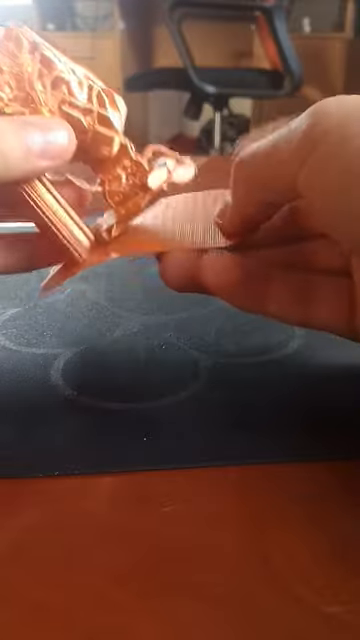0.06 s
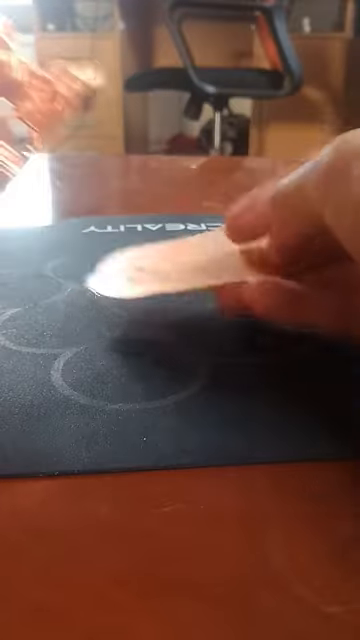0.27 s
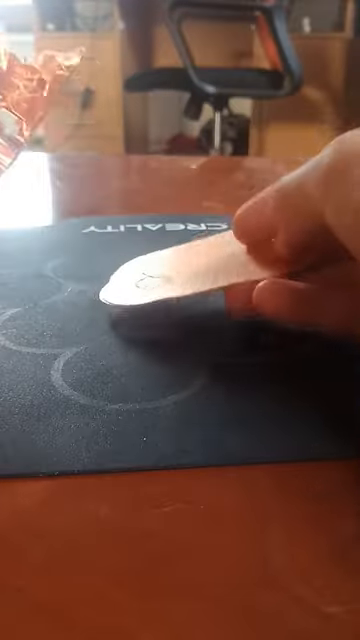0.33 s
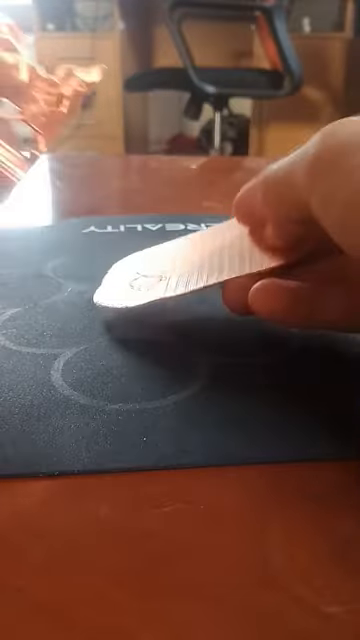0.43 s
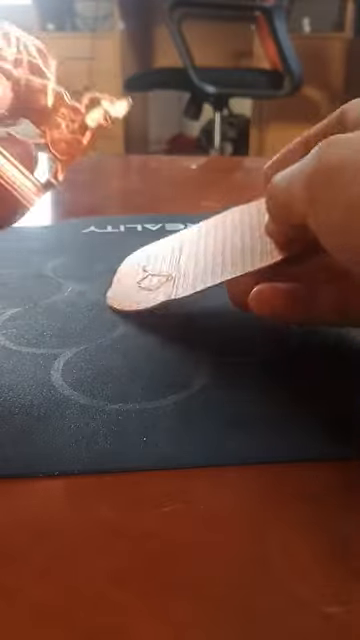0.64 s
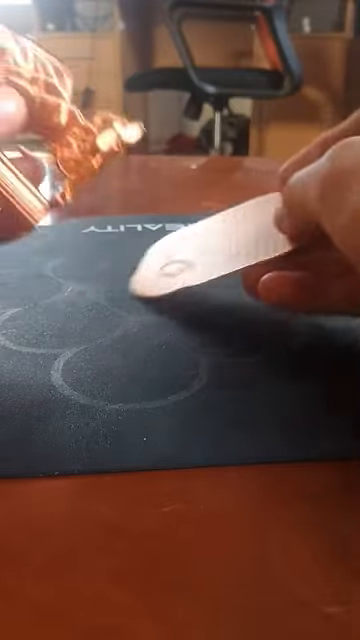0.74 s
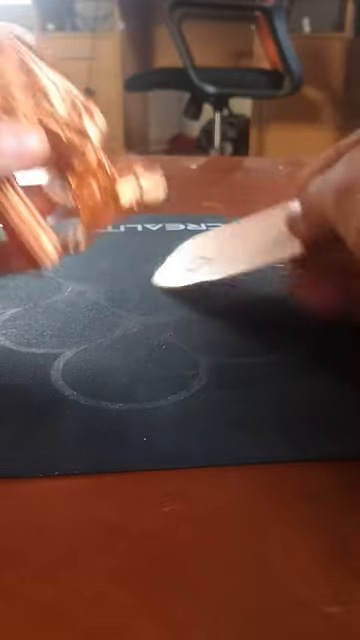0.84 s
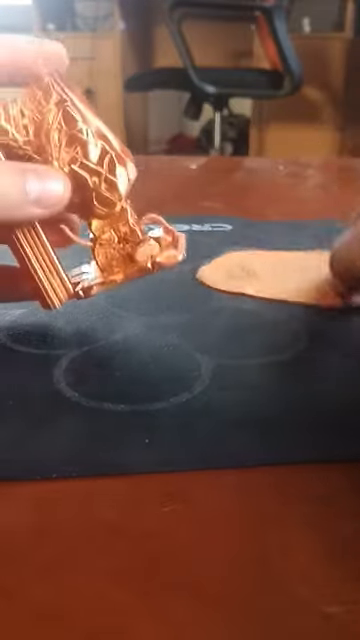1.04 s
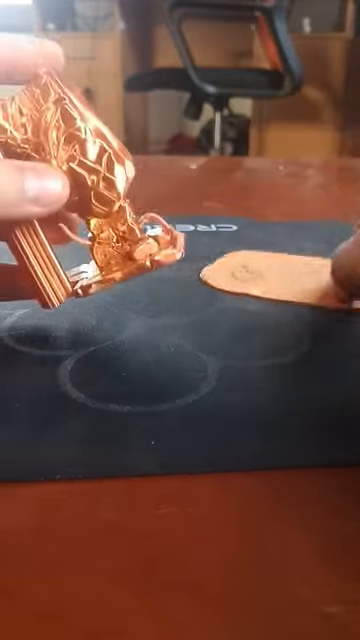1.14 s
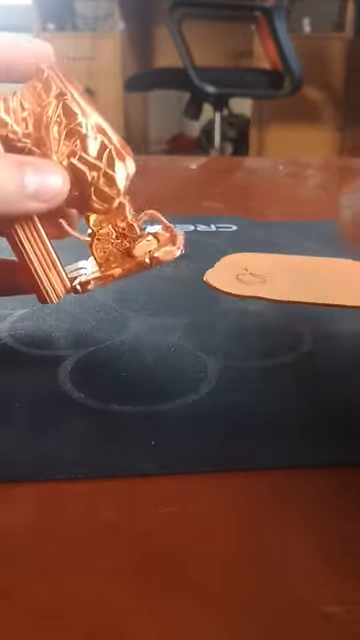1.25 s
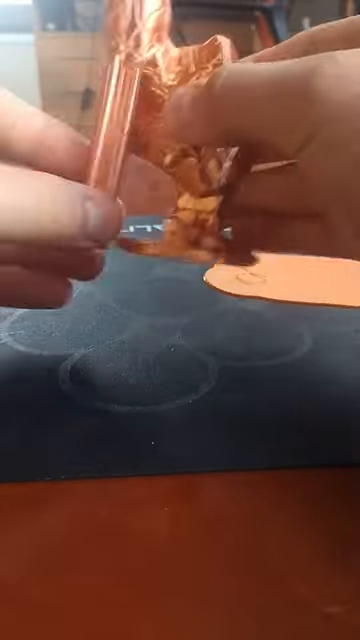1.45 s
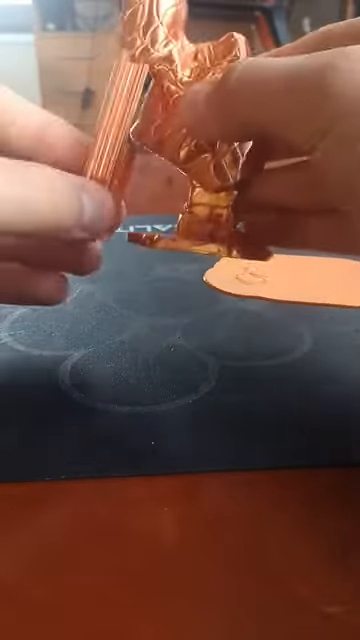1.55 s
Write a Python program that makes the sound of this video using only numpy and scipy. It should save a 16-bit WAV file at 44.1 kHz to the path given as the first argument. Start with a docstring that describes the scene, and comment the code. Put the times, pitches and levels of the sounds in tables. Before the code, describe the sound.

Plastic snapping off a small figure in sharp cracks, then a soft tap.

```python
"""A printed plastic support snaps off a figure, close up, in a pair of hands above a desk.
A few small struts crack and ring, then the support tears free in a loud cluster of snaps;
later it is laid on the mat with a few soft taps. Dull knocks carry through hands and desk.
A small room answers each click. Underneath lie room tone, a low hum, faint finger rubs
and thin background tones, and the overall level dips briefly a few times."""
import sys
import numpy as np
from scipy import signal
from scipy.fft import rfft, irfft
from scipy.io import wavfile
from scipy.ndimage import uniform_filter1d

SR = 44100
rng = np.random.default_rng(int(sys.argv[2]) if len(sys.argv) > 2 else 0)


def master(y):
    """Save y as 16-bit WAV."""
    cut = np.clip(np.atleast_2d(y).T, -1, 1)
    pcm = np.round(cut * 32767)  # scale
    wavfile.write(sys.argv[1], SR, pcm.astype(np.int16))


N = 70560
TIME, FREQS = np.arange(N) / SR, np.fft.rfftfreq(N, 1 / SR)


def amp(db):
    """Decibels to gain."""
    return 10 ** (np.asarray(db) / 20)


def unit(x):
    """Scales to rms 1."""
    return x / np.sqrt(np.mean(x ** 2) + 1e-20)


def curve(points, hz):
    """Reads a table on a log-frequency axis."""
    f, value = np.transpose(points)
    return np.interp(np.log(hz + 1), np.log(f + 1), value)


def add(mix, s, sound):
    """Mixes a sound in at s seconds."""
    part = mix[..., max(round(s * SR), 0):][..., :sound.shape[-1]]
    part += sound[..., :part.shape[-1]]


def minimum_phase(db):
    """Tightest impulse response with the given spectrum."""
    log_gain = np.log(amp(np.r_[db, db[-2:0:-1]]))
    return np.fft.ifft(np.exp(np.conj(signal.hilbert(log_gain)))).real


def drift(rate_hz):
    """Slow random modulation of rms 1."""
    return unit(irfft(rfft(rng.standard_normal(N)) * (FREQS > 0) / (1 + (FREQS / rate_hz) ** 4), N))


def wavering_tone(hz, db, waver_db, wander_hz):
    """A sine that wavers in level and pitch."""
    gain = np.sqrt(2) * amp(db + waver_db * drift(5))
    pitch = hz + wander_hz * drift(3.8)
    return gain * np.sin(2 * np.pi * np.cumsum(pitch) / SR)


# EQ of the room tone: f/Hz, relative level/dB
ROOM_TONE_EQ = [(20, -11), (45, 8), (110, 2), (200, -8), (255, -13.5), (330, -8.5), (500, -21), (900, -19),
                (1400, -15.5), (1800, -9.5), (2050, -16.5), (2400, -8.5), (2800, -16), (3400, -27.5),
                (6500, -34.5), (8500, -42), (14000, -41), (15300, -34), (16000, -46.5)]
def room_tone(level_db=-60.5, patch_db=2):
    """A quiet, bass-heavy noise bed whose bands swell and sink in patches."""
    hz, _, bands = signal.stft(rng.standard_normal(N), SR, nperseg=2048, noverlap=1536)
    patches = uniform_filter1d(rng.standard_normal(bands.shape), size=6, axis=0)
    patches = unit(uniform_filter1d(patches, size=8, axis=1))
    bands *= amp(curve(ROOM_TONE_EQ, hz)[:, None] + patch_db * patches)
    return amp(level_db) * unit(signal.istft(bands, SR, nperseg=2048, noverlap=1536)[1][:N])


# Fader ride of the upper hum: t/s, level/dB
UPPER_HUM_RIDE = [(0, -92), (0.25, -73), (0.502, -72.5), (0.581, -65), (0.819, -63.5), (1.0, -69),
                  (1.08, -72), (1.17, -63), (1.381, -59.5), (1.47, -66.5), (1.54, -88)]
def hum():
    """A steady low hum and a higher one that swells and fades."""
    low = wavering_tone(hz=62.3, db=-56, waver_db=-0.73, wander_hz=0.87)
    ride_db = np.interp(TIME, *np.transpose(UPPER_HUM_RIDE))
    return low + wavering_tone(hz=172.4, db=ride_db, waver_db=1.0, wander_hz=2.7)


# Decay of the reverb: f/Hz, T60/s
REVERB_DECAY = [(150, 0.13), (600, 0.27), (2200, 0.29), (4500, 0.28), (7000, 0.28), (9000, .2),
                (15000, 0.15)]
# EQ of the reverb: f/Hz, relative level/dB
REVERB_EQ = [(150, 5.5), (1000, 2.5), (2500, 1.5), (6000, 1), (10000, -2), (15000, 7)]
def reverb(send, wet_db=-5.5, predelay_s=0.001, build_s=0.0071):
    """Dense reflections of a small room; the lows and the top die before the mids."""
    count = SR // 2
    hz, age, bands = signal.stft(rng.standard_normal(count), SR, nperseg=256)
    bands *= amp(curve(REVERB_EQ, hz)[:, None] - 60 * age / curve(REVERB_DECAY, hz)[:, None])
    fade_in = np.clip((TIME[:count] - predelay_s) / build_s, 0, 1)
    tail = signal.istft(bands, SR, nperseg=256)[1][:count] * fade_in
    return amp(wet_db) * signal.fftconvolve(send, tail / np.linalg.norm(tail))[:N]


# Finger rubs and faint narrow background tones, one near 500 Hz, perhaps a distant motor:
# t/s, length/s, level/dB, centre f/Hz, half-width/octaves
RUBS_AND_TONES = [(0.395, 0.11, -70, 499.4, 0.029), (0.68, .11, -74.5, 1110, 0.034),
                  (0.733, 0.075, -74, 4200, 0.075), (0.739, 0.083, -81.5, 5770, 0.29),
                  (0.957, 0.15, -72, 4200, 0.18), (1.0, 0.084, -62, 2220, 0.22),
                  (1.016, 0.11, -72.5, 5200, .3), (1.033, 0.068, -69.5, 948.5, 0.63),
                  (1.111, 0.16, -71.5, 5540, 0.14), (1.118, 0.102, -68.5, 2210, 0.21),
                  (1.235, 0.013, -52.5, 3530, 1), (1.268, 0.15, -70, 985, 0.93),
                  (1.354, 0.034, -62, 3980, .7)]
def rubs_and_tones(grain_db=1.5, high_cut_hz=7500):
    """Swells of grainy noise: wide bands hiss as friction, the narrowest sound as faint tones."""
    out, f = np.zeros(N), FREQS + 1
    for s, length, db, hz, octaves in RUBS_AND_TONES:
        grains = rng.standard_normal(N) * amp(grain_db * drift(200))
        band = 1 / (1 + (np.log2(f / hz) / octaves) ** 2)
        noise = unit(irfft(rfft(grains) * band / (1 + (f / high_cut_hz) ** 10), N))
        count = int(length * SR)
        add(out, s, amp(db) * noise[:count] * signal.windows.tukey(count, .5))
    return out


# Knocks under the break and the set-down: t/s, level/dB, f/Hz, T60/s
KNOCKS = [(0.33, -43, 134.7, 0.053), (0.333, -50.5, 328.8, 0.23), (0.3455, -49, 860, .02),
          (1.251, -43.5, 149.6, 0.08), (1.252, -60, 371.6, 0.21), (1.2533, -47, 768, 0.035)]
def knocks():
    """Dull, quickly damped thuds carried through the hands and the desk."""
    out, t = np.zeros(N), TIME[:SR // 4]
    for s, db, hz, t60 in KNOCKS:
        add(out, s, amp(db - 60 * t / t60) * np.sin(2 * np.pi * hz * t))
    return out


# Modes of the freed support: f/Hz, relative level/dB
SUPPORT_MODES = [(1912, -7), (2056, 3.5), (2092, 3), (2228, -4.5), (2308, -2), (2528, 4.5), (2622, 0.5),
                 (2868, -3), (3156, -4.5), (3611, -7.5), (4521, -6.5), (6023, -0.5), (6146, -1.5)]
def support_ring(break_s=0.3235, gain_db=-36.5, attack_s=.004, t60_s=.19):
    """The support rings faintly as it springs free."""
    out, t = np.zeros(N), TIME[:SR // 2]
    modes = sum(amp(db) * np.sin(2 * np.pi * (hz * t + rng.random())) for hz, db in SUPPORT_MODES)
    envelope = amp(gain_db - 60 * t / t60_s) * (1 - np.exp(-t / attack_s))
    add(out, break_s, envelope * modes)
    return out


# EQ of a crack in the plastic: f/Hz, relative level/dB
CRACK_EQ = [(60, -35), (250, -18.5), (500, -19.5), (800, -14), (1150, -20.5), (1650, -5.5), (2100, -2),
            (2900, -2), (3800, -0.5), (5200, -5), (6200, -0.5), (7500, -8.5), (9000, -13.5), (13800, -20),
            (15200, -6), (16000, -25.5)]
def snap(level_db, strut_hz, ring_db, treble_db, bass_db, decay_s):
    """A burst of micro-fractures and the quickly damped ring of the strut, as two rows."""
    crack_attack_s, ring_attack_s, ring_t60_s = 0.00097, .0005, 0.016
    t, hz = TIME[:4096], np.fft.rfftfreq(4096, 1 / SR)
    burst = rng.standard_normal(len(t)) * (1 - np.exp(-(t / crack_attack_s) ** 2)) * np.exp(-t / decay_s)
    spectrum = rfft(burst)
    # Flatten the burst so that the EQ sets its colour.
    spectrum /= np.sqrt(uniform_filter1d(abs(spectrum) ** 2, size=160) + 1e-12)
    high_shelf = treble_db / (1 + (8000 / (hz + 1)) ** 8)
    low_shelf = bass_db / (1 + (hz / 1200) ** 4)
    eq = rfft(minimum_phase(curve(CRACK_EQ, hz) + high_shelf + low_shelf))
    crack = irfft(spectrum * eq) * (1 - t / t[-1]) ** 2
    ring_envelope = (1 - np.exp(-(t / ring_attack_s) ** 2)) * amp(-60 * t / ring_t60_s)
    ring = ring_envelope * np.sin(2 * np.pi * strut_hz * t)
    layers = np.array([unit(crack), amp(ring_db) * unit(ring)])
    return 2 * amp(level_db) * layers / np.linalg.norm(layers.sum(0))


# The support touching down on the mat:
# t/s, relative level/dB, ring f/Hz, ring over click/dB, low shelf/dB, contact time/s
MAT_TAPS = [(1.2455, -23.5, 2250, -3, 7, 0.0034), (1.2488, -19.5, 1966, -11, 3.1, 0.0026),
            (1.2528, -17.5, 3015, -2.5, 2.5, 0.0026), (1.2612, -17, 3370, -0.5, 2.57, 0.00077)]
# Struts breaking:
# t/s, relative level/dB, ring f/Hz, ring over crack/dB, high shelf/dB, low shelf/dB, crumble time/s
STRUT_BREAKS = [(0.0815, -26.5, 3320, -2.5, -1.5, -4.5, .0008),
                (0.0907, -18.5, 3445, -2, -3.5, -5.5, .0008), (0.1170, -28.5, 3330, -2.5, 0, 4, .0008),
                (0.1365, -40, 3360, 0, 5, 3.5, .001), (0.152, -45.5, 2480, -8, -3.5, 0.5, .001),
                (0.2068, -14, 3560, 0.5, -3, -9.5, 0.0013), (0.2100, -17, 4408, 1, 4.5, -6, .001),
                (0.2114, -14.5, 5880, -1.5, -4, -4, .0007), (0.2491, -37, 3250, -1, 1.5, 0.5, .001),
                (0.2757, -36, 4300, -7.5, 9.5, -7.5, .0012), (0.2933, -23.5, 2500, -6.5, -1.5, -4.5, .001),
                (0.2953, -20, 2310, 3, 7, -8, .0012), (0.2977, -14.5, 3200, -21.5, -0.5, -2.5, .001),
                (0.3018, -14.5, 3850, -7.5, -1, -4.5, .0009), (0.307, -18.5, 2383, -9, -2, 5, .0012),
                (0.3208, -10.5, 2540, -1, 4, -6, .001), (0.3231, 0, 2590, -4, -2.5, -5, 0.002),
                (0.3277, -11.5, 2450, -9, -1.5, 1.5, .001), (0.3305, -4.5, 2500, -4.5, -0.5, -1, .0011),
                (0.3320, -6.5, 2004, -2.5, -1.5, -5, .0012), (0.3465, -8.5, 2270, 15.5, -14.5, 10, .001),
                (0.3549, -16, 2150, -2, -10, 10.5, .001), (0.3638, -14, 2320, -3.5, 0.5, -2.5, .0008)]
def plastic(echo_s=.00093, echo_gain=0.092, tap_treble_db=-9):
    """Breaks and taps with their reflection off the mat, as a row of cracks and a row of rings."""
    direct = np.zeros((2, N))
    for s, *strut in STRUT_BREAKS:
        add(direct, s, snap(*strut))
    for s, level_db, hz, ring_db, bass_db, contact_s in MAT_TAPS:  # the soft mat takes the edge off
        add(direct, s, snap(level_db, hz, ring_db, tap_treble_db, bass_db, contact_s))
    heard = direct.copy()
    add(heard, echo_s, echo_gain * direct)
    return heard


# EQ of the stereo side channel: f/Hz, gain/dB
SIDE_EQ = [(60, -45.5), (130, -26), (300, -22), (700, -22), (1400, -16), (2500, -49), (6000, -54),
           (15000, -41.5)]
def scene(ring_send=0.24):
    """A close, nearly mono mix: only a trace of the room differs between left and right."""
    cracks, rings = plastic()
    direct = cracks + knocks() + rubs_and_tones()
    send = direct + ring_send * rings
    mid = direct + rings + support_ring() + reverb(send) + hum() + room_tone()
    ambience = 2 * reverb(send) + room_tone()
    side = irfft(rfft(ambience) * amp(curve(SIDE_EQ, FREQS)), N)
    return np.array([mid + side, mid - side])


# Dips on the master fader: centre t/s, length/s, depth/dB
LEVEL_DIPS = [(0.027, 0.016, 8), (0.185, 0.015, 6), (0.732, 0.027, 6.5), (0.851, .022, 5.5),
              (1.108, 0.014, 8), (1.505, 0.037, 29)]
def record(dry, edge_s=0.0038, high_cut_hz=15900):
    """The level dips briefly a few times, and a steep high cut trims the top."""
    dip_db = sum(depth * .5 * (1 - np.tanh((abs(TIME - s) - length / 2) / edge_s))
                 for s, length, depth in LEVEL_DIPS)
    high_cut = signal.firwin(161, high_cut_hz, window=("kaiser", 8), fs=SR)
    return signal.oaconvolve(dry * amp(-dip_db), high_cut[None], "same")


dry = scene()
out = record(dry)
master(out)
```